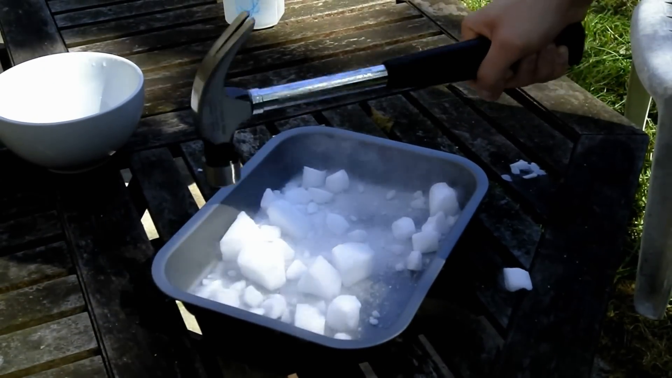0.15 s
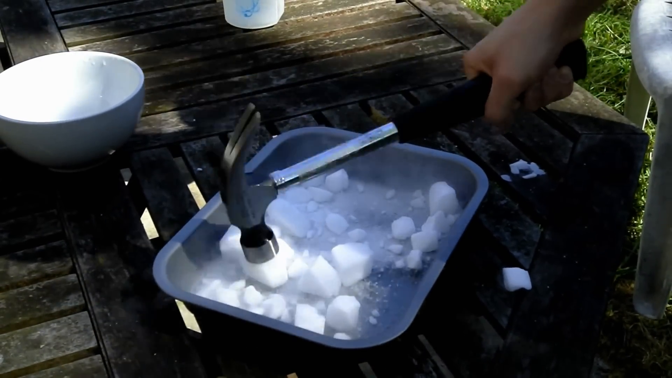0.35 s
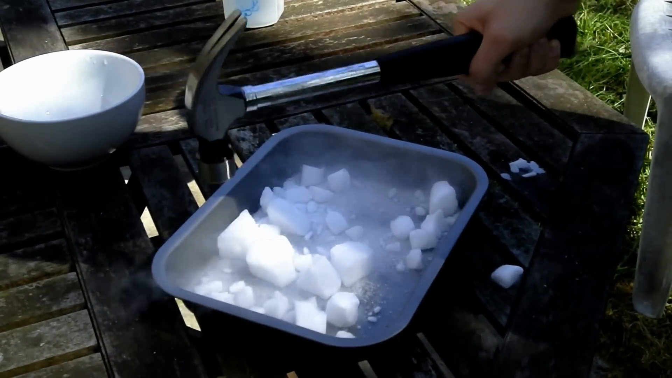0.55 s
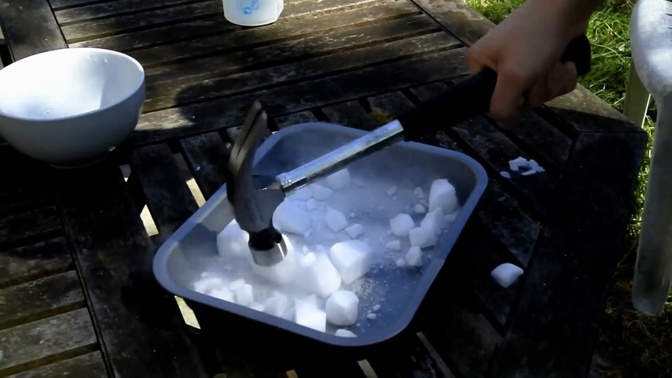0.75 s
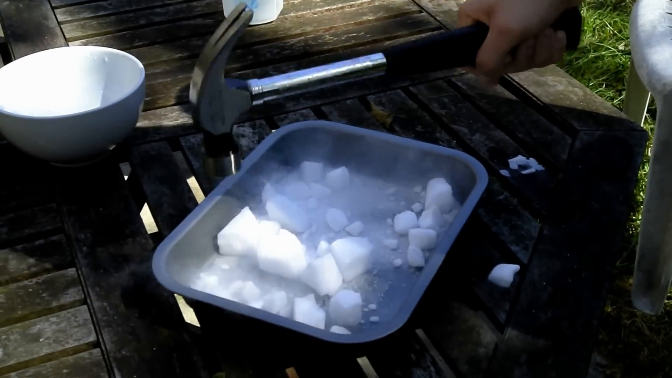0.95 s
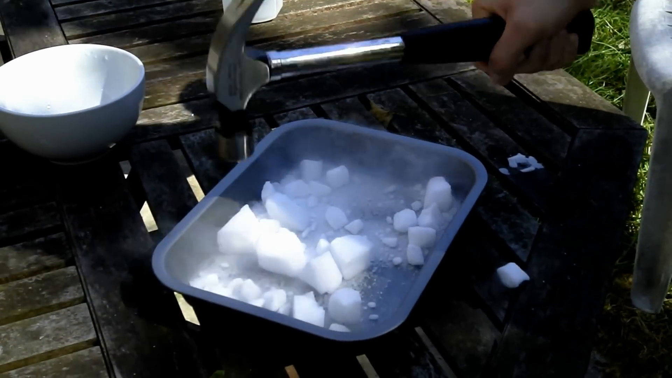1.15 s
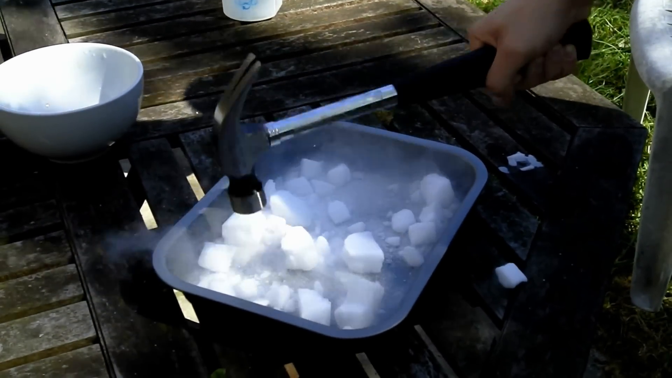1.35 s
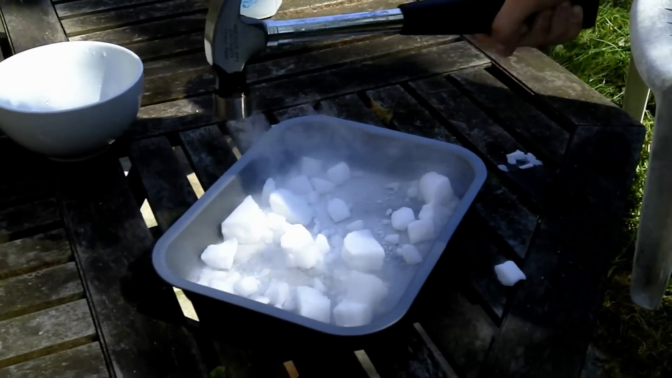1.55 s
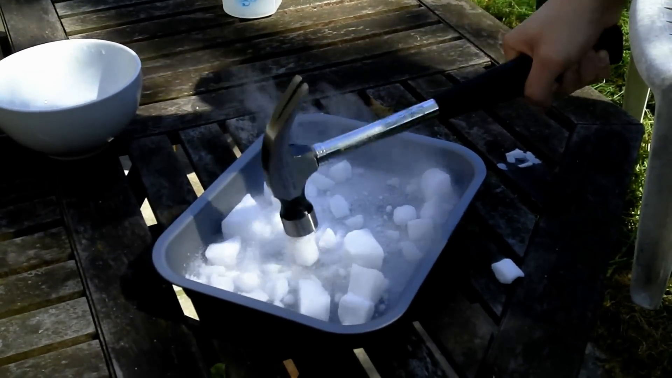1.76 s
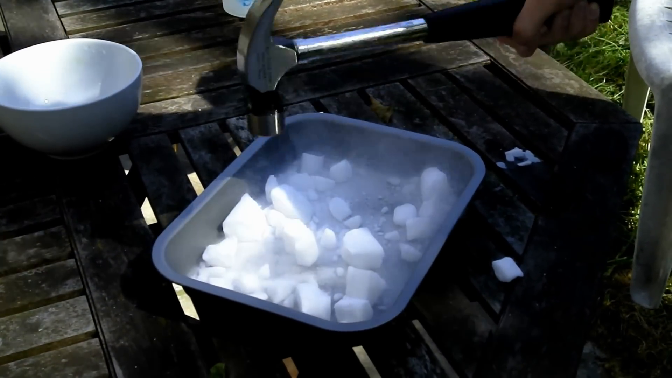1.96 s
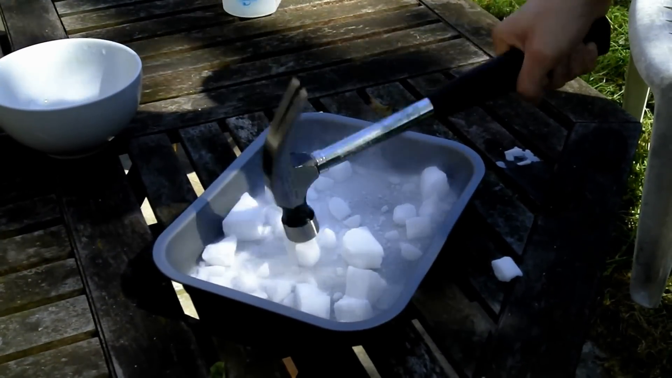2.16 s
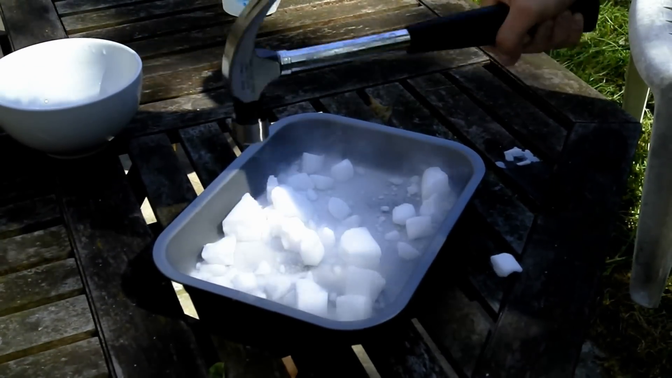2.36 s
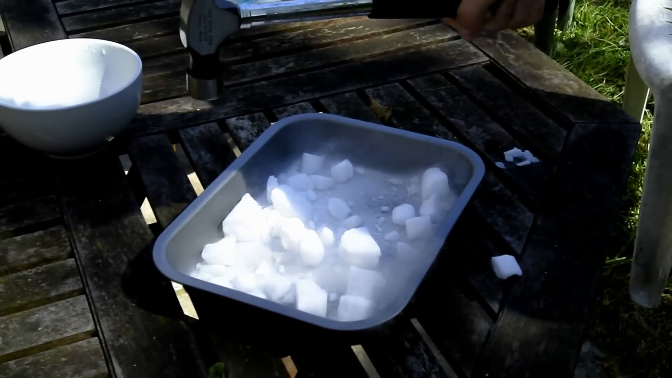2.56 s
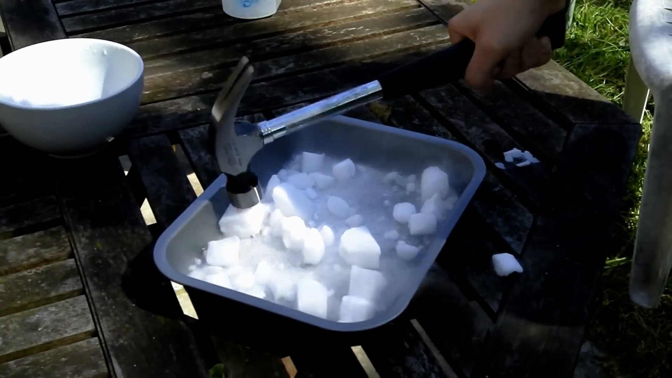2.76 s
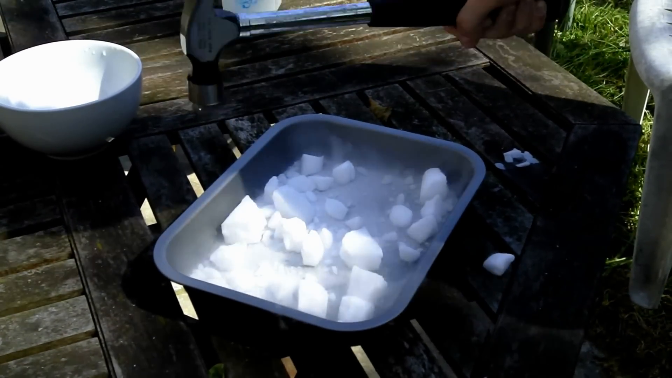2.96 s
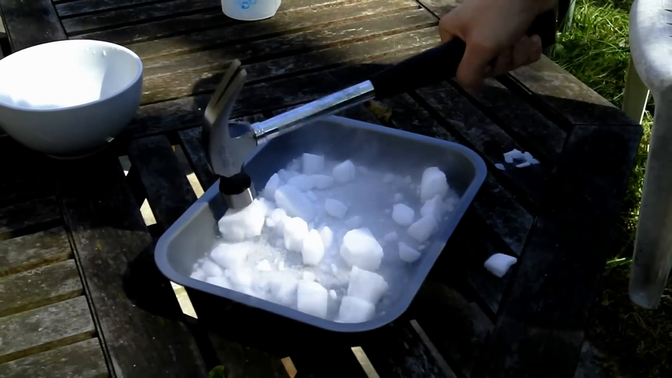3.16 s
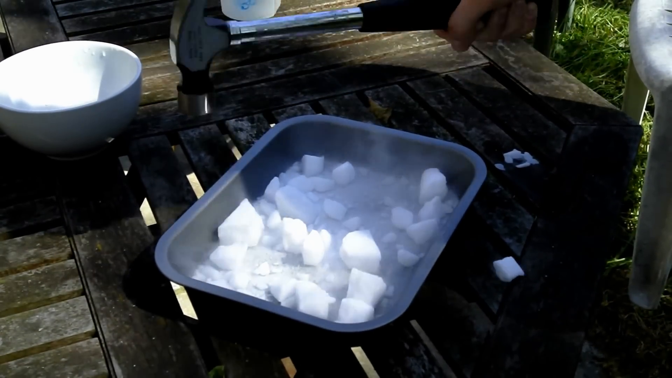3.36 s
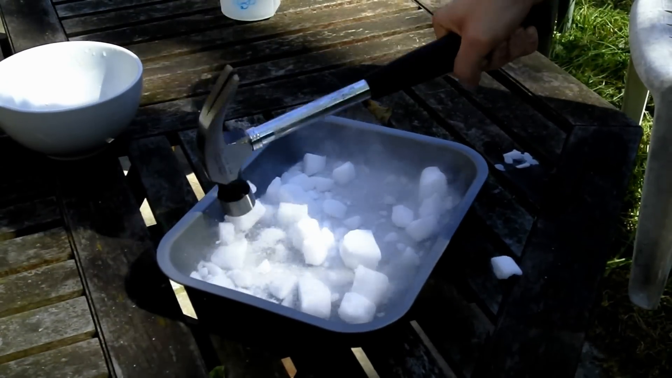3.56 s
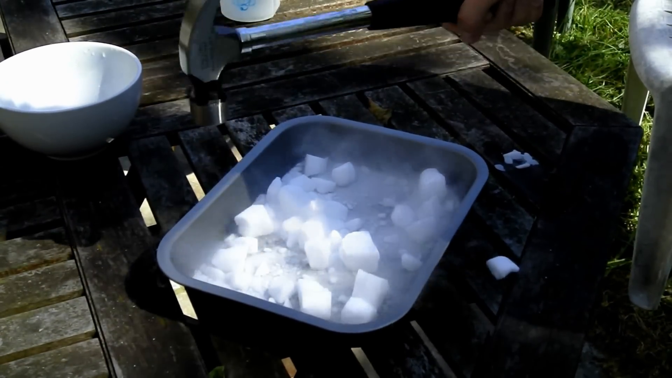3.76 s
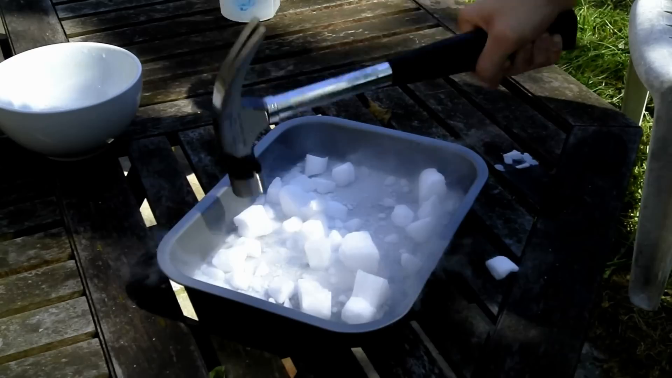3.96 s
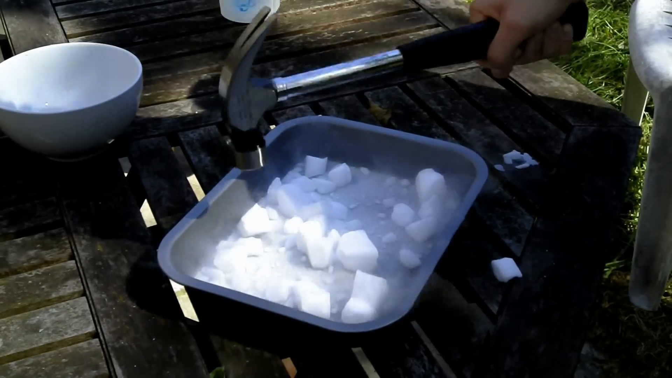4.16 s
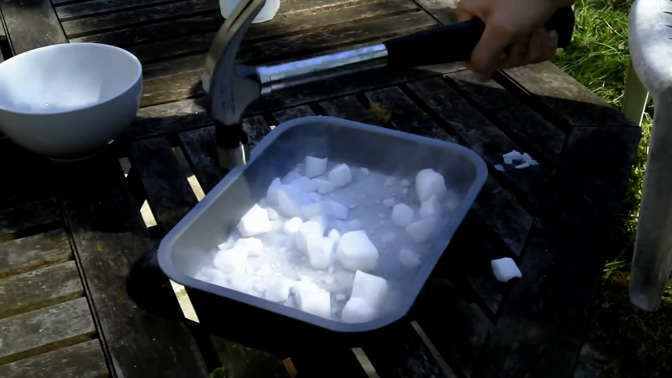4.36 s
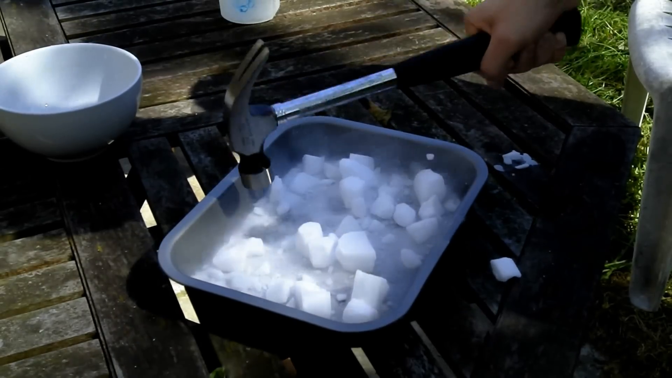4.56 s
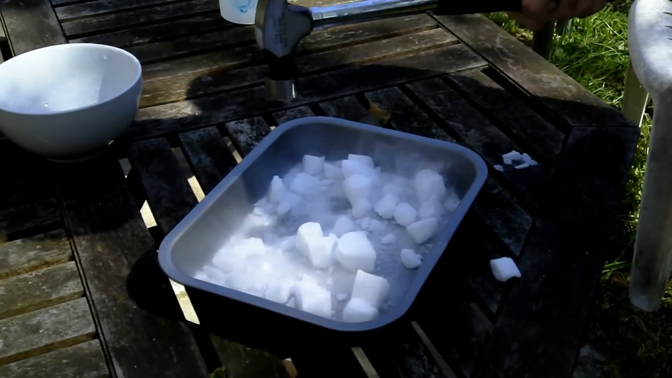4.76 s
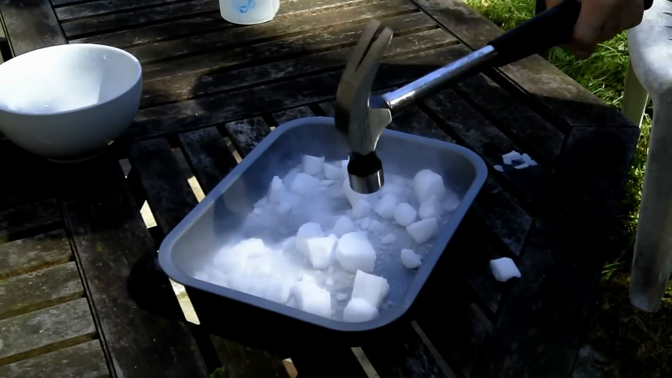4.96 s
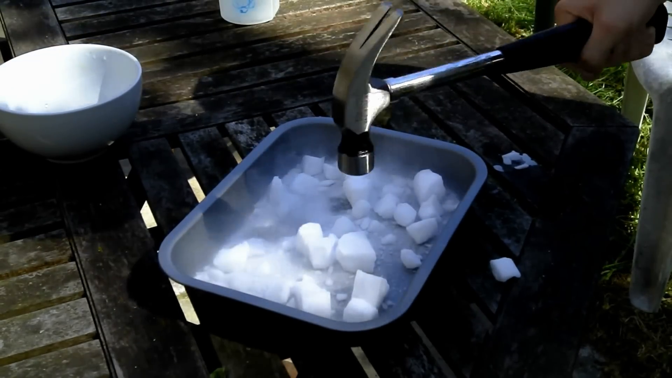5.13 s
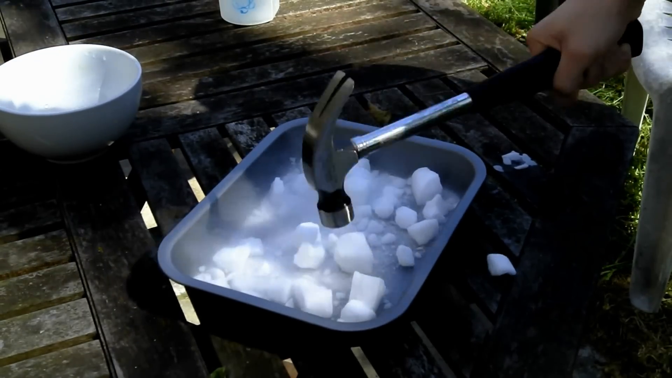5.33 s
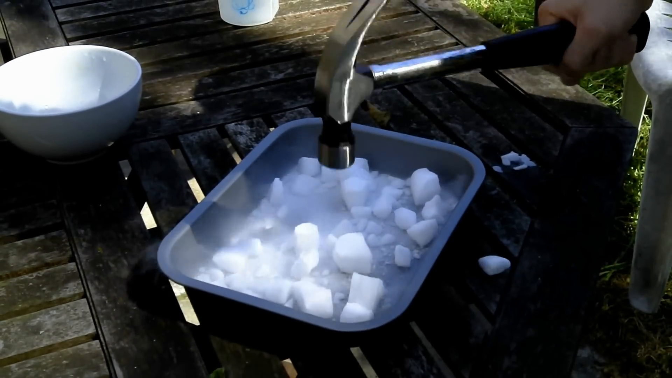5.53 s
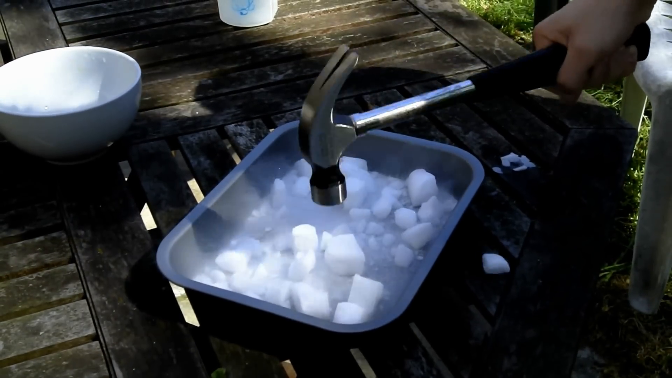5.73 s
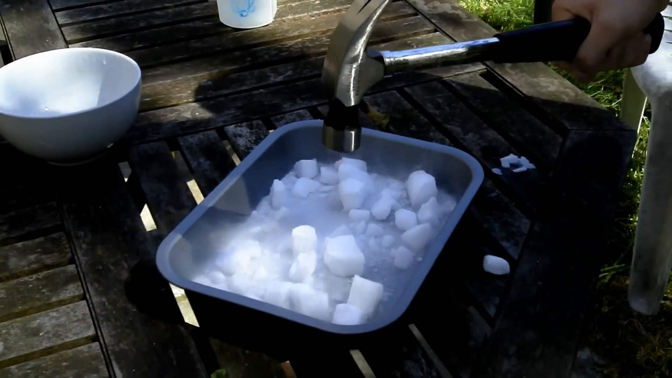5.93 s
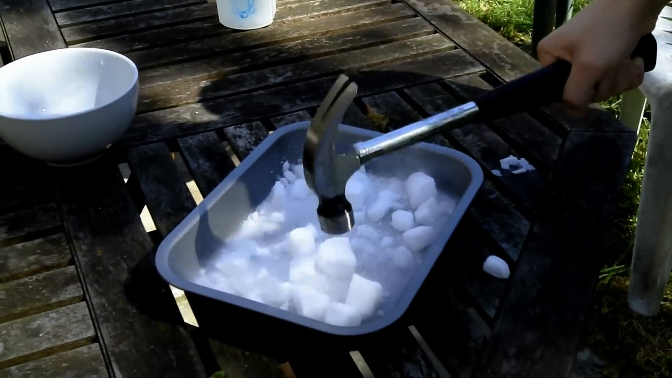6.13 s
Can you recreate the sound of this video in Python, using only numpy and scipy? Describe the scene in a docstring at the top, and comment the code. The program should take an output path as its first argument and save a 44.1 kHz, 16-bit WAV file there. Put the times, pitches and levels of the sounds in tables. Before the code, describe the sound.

A hammer smashes lumps of dry ice in a metal tray outdoors, sharp cracks, rattle and pattering splinters over low rumbling wind.

```python
"""Fourteen sharp cracks with thumps, a rattling tray and pattering splinters, over rumbling wind, hiss and a whine.
A claw hammer smashes lumps of dry ice in a metal tray on a wooden garden table. Dense bursts of tiny clicks
make the cracks, rattle and splinters, and damped resonances make the tray ring. Filtered noise makes
the wind and the soft outdoor hiss; a slightly wavering sine makes the thin whine, which comes in spells."""
import sys
import numpy as np
from scipy import signal
from scipy.fft import rfft, irfft
from scipy.io import wavfile
from scipy.ndimage import uniform_filter1d

SR = 44100
rng = np.random.default_rng(int(sys.argv[2]) if len(sys.argv) > 2 else 0)


def digitize_waveform(pressure):
    """Quantize a signal to 16-bit integers and store it at the path in sys.argv[1].

    Rows of a 2-D input are taken as channels; values are limited to [-1, 1].
    """
    field = np.atleast_2d(pressure).T
    bounded = np.clip(field, -1, 1)
    quanta = np.round(bounded * 32767).astype(np.int16)
    wavfile.write(sys.argv[1], SR, quanta)


N = 277372
TIME = np.arange(N) / SR   # seconds

# All dB values in the tables are relative: each layer also has an overall level.
# Outdoor hiss over time. Each row: time in seconds, level in dB.
HISS_LEVEL = [(0.025, -61), (0.78, -68.4), (1.73, -72), (2.62, -74.5), (3.15, -59), (3.55, -51),
              (4.04, -53), (5.25, -53.5), (5.66, -61.5), (6.08, -62)]
# Spells of the whine. Each row: start in seconds, end in seconds, level in dB relative to the hiss curve.
WHINE_SPELLS = [(0.0, 0.507, 6.5), (1.093, 1.355, 0), (2.498, 3.12, 7), (3.45, 5.08, 3.5)]
# Strength of the breeze. Each row: time in seconds, rumble level in dB.
BREEZE = [(0, -20.5), (0.35, -17.5), (0.95, -14.5), (1.12, -18.5), (1.4, -14), (1.7, -18.5), (1.9, -14),
          (2.35, -18.5), (2.72, -13.5), (2.95, -22.5), (3.45, -22), (3.95, -19.5), (4.35, -20.5),
          (4.95, -22), (5.15, -18.5), (5.7, -19.5), (6.08, -38), (6.29, -31.5)]
# Gusts that buffet the microphone. Each row: time in seconds, buffet level in dB, swell of the wind in dB.
GUSTS = [(0.273, -56, -10), (0.577, -25, -11.5), (0.619, -26, -13), (0.649, -17.5, -24), (0.85, -29.5, -16),
         (1.258, -28.5, -14), (1.432, -22, -17), (1.527, -29.5, -11.5), (1.905, -34, -17.5),
         (1.991, -31.5, -25), (2.156, -29, -14), (2.484, -30, -7.5), (2.512, -35.5, -15), (2.63, -34, -13),
         (2.674, -21.5, -15), (2.702, -22, -17), (3.91, -45, -19), (4.32, -52.5, -20.5),
         (5.568, -43.5, -23)]
# Secondary knocks and single chips in the tray. Each row: start in seconds, level in dB.
KNOCKS_AND_CHIPS = [(1.599, -34.5), (1.621, -44.5), (2.293, -9), (2.355, -16), (2.382, -23.5),
                    (3.3664, -12), (3.4335, -21), (3.895, -23.5), (3.946, -25.5), (4.125, -6),
                    (4.664, -11.5), (4.696, -17.5), (4.7306, -21), (4.755, -23), (4.781, -24.5),
                    (5.587, -25.5), (5.8465, -24), (6.223, -16)]
# Hammer blows. Each row: time in seconds, crack level in dB, thud level in dB, knock pitch in Hz,
# knock level in dB, rattle level in dB, time for the rattle to fall 60 dB in seconds,
# splinter shower level in dB, extra length of the shower in seconds.
HAMMER_BLOWS = [(0.0624, -9, -28.5, 1550, -10, -26, 0.42, -30.5, 0.013),
                (0.4731, -10, -35, 1260, -15.5, -24.5, 0.31, -42, 0.027),
                (0.8773, -12, -29, 1180, -32, -31.5, 0.39, -48.5, 0.06),
                (1.3453, -13.5, -36, 1250, -25, -24, 0.27, -37.5, 0.021),
                (1.8177, -16.5, -56.5, 459, -8.5, -27.5, 0.29, -41.5, 0.0097),
                (2.2787, -18.5, -35, 668, -21, -29, 0.43, -44, 0.024),
                (2.831, -11.5, -24, 880, -21, -26.5, 0.42, -38, 0.0084),
                (3.2399, -7.5, -20, 905, -15, -23.5, 0.62, -30, 0.011),
                (3.624, -5.5, -19, 1290, -23, -21.5, 0.52, -23.5, 0.042),
                (4.111, -9, -16, 864, -7, -24.5, 0.48, -26.5, 0.0038),
                (4.5285, -6.5, -20, 1260, -12, -22, 0.3, -33.5, 0.098),
                (5.354, -4.5, -18, 920, -11, -25, 0.46, -35, 0.025),
                (5.7209, -6.5, -21.5, 682, -4, -26.5, 0.45, -35, 0.004),
                (6.153, -6.5, -21, 637, -7, -28, 1, -27.5, 0.089)]
# Resonances of the loaded tray on its table. Each row: pitch in Hz, width in Hz, level in dB.
TRAY_MODES = [(158, 80, 11), (400, 57, 7), (475.2, 29, 13.5), (635, 44, 6), (720, 72, 7), (927, 90, 3),
              (1231, 60, 5), (1540, 230, -4.5), (2210, 1500, -6), (3520, 69, -3.5)]
# Tone colour of each layer. Each row: frequency in Hz, level in dB.
HISS_COLOUR = [(40, -12), (130, 4), (300, 2.5), (500, 0), (950, -4), (1100, -5.5), (1700, -10.5),
               (3100, -19), (6400, -19.5), (8500, -23), (11000, -25.5), (15000, -35)]
RUMBLE_COLOUR = [(8, -11), (18, 3), (30, -0.5), (50, -9), (85, -29), (150, -44), (300, -59), (1000, -92)]
TURBULENCE_COLOUR = [(20, -5.5), (55, 6), (95, 6), (160, -13), (300, -33), (700, -49), (2000, -80)]
BUFFET_COLOUR = [(15, -7.5), (60, 6.5), (130, -4), (250, -17.5), (600, -41), (1500, -55), (5000, -92.5)]
SPLINTER_COLOUR = [(100, -18), (300, 0.5), (700, 0.5), (2000, -4), (6000, -2), (9000, -8), (12000, -7.5),
                   (15000, -15)]
RATTLE_COLOUR = [(60, -17), (150, -12.5), (300, -6.5), (700, -3), (1500, 0.5), (3000, -7), (6000, -9.5),
                 (9000, -17.5), (15000, -22)]
CRACK_COLOUR = [(100, -21.5), (300, -1), (700, -4), (1500, -2.5), (3000, -3), (6000, -1), (9000, -6),
                (15000, -11.5)]
CLATTER_COLOUR = [(150, -12.5), (400, -19), (700, -7), (1500, -4.5), (3000, -1.5), (6000, -6.5),
                  (9000, -10.5), (15000, -22.5)]
THUD_COLOUR = [(40, -14), (100, -2.5), (180, 1), (290, -2), (450, -7.5), (700, -9.5), (1100, -16.5),
               (3000, -51.5)]
# Stereo width at each pitch. Each row: frequency in Hz, level of the sides against the middle in dB.
STEREO_WIDTH = [(60, -7.5), (200, -21), (400, -16.5), (900, -18), (1400, -12), (2500, -8), (5000, -6),
                (9000, -4.5), (15000, -4.5)]

WHINE_HZ, WHINE_FADE_S = 1278, 0.055
GUST_S = 0.022   # spread (standard deviation) of a gust's swell
# the rumble swells as the hammer comes down: rise, lead on the blow, spread (standard deviation)
SWING_DB, SWING_LEAD_S, SWING_S = 5, 0.02, 0.025
# splinters: flight before the first land, time for the shower to thicken, time to fall 60 dB as it thins out
FLIGHT_S, THICKEN_S, THIN_OUT_T60_S = 0.05, 0.029, 0.14
CRACK_T60_S = 0.011   # time for the crack to fall 60 dB
NOTCH_HZ, CUTOFF_HZ = 7900, 15900


def from_db(db):
    """Turn decibels into an amplitude factor."""
    return 10 ** (np.asarray(db) / 20)


def rms_one(x):
    """Scale a signal to an rms (average strength) of 1."""
    return x / np.sqrt(np.mean(x ** 2) + 1e-20)


def in_time(rows):
    """Join (seconds, value) rows with straight lines."""
    return np.interp(TIME, *np.transpose(rows))


def gains(points, size):
    """A colour's gain at every frequency step of an FFT."""
    hz, level_db = np.transpose(points)
    bin_hz = np.fft.rfftfreq(size, 1 / SR)
    return from_db(np.interp(np.log(bin_hz + 1), np.log(hz), level_db))


def colour(x, points, size=16384, keep_power=True):
    """Filter without pre-echo (minimum phase); white noise keeps its power unless told otherwise."""
    cepstrum = irfft(np.log(gains(points, size)))
    # fold the second half onto the first, so that the response starts at once
    cepstrum[1:size // 2] *= 2
    cepstrum[size // 2 + 1:] = 0
    response = irfft(np.exp(rfft(cepstrum)))
    if keep_power:
        response = response / np.linalg.norm(response)
    return signal.oaconvolve(x, response)[:N]


def grains(per_s, spread_db):
    """Random tiny contacts of uneven size; rms 1."""
    sizes = from_db(spread_db * np.minimum(rng.exponential(1, N), 4))
    signs = rng.choice([-1, 1], N)
    happens = rng.random(N) < per_s / SR
    return rms_one(sizes * signs * happens)


def clumps(depth_db):
    """A quick random change of strength that bunches grains over a few milliseconds; rms 1."""
    wander = colour(rng.standard_normal(N), [(60, 0), (150, -12), (600, -50)])
    return rms_one(from_db(depth_db * wander))


def burst(start, rise, hold, t60):
    """Envelope that rises, then dies away once its age passes hold; it lasts at most a second."""
    out = np.zeros(N)
    first = int(start * SR)
    age = TIME[:min(SR, N - first)]
    decay = from_db(-60 * np.maximum(age - hold, 0) / t60)
    out[first:first + len(age)] = np.minimum(age / rise, 1) * decay
    return out


def pulses(events):
    """One single-sample impulse for each (seconds, dB)."""
    out = np.zeros(N)
    for s, level_db in events:
        out[int(s * SR)] = from_db(level_db)
    return out


def swell(middle, spread):
    """A smooth bell-shaped bump of height 1."""
    return np.exp(-((TIME - middle) / spread) ** 2 / 2)


def stereo(force, spectrum, wide_db):
    """Every contact comes from its own spot; the treble is wider than the bass."""
    mid = colour(force, spectrum)
    scattered = colour(force * rng.choice([-1, 1], N), spectrum)
    side = from_db(wide_db) * colour(scattered, STEREO_WIDTH, keep_power=False)
    return np.array([mid + side, mid - side])


def resonance(x, hz, width_hz):
    """One damped mode that rings when struck; gain 1 at its peak."""
    r = np.exp(-np.pi * width_hz / SR)
    feedback = [1, -2 * r * np.cos(2 * np.pi * hz / SR), r * r]
    return (1 - r * r) / 2 * signal.lfilter([1, 0, -1], feedback, x + 1e-18)


def tray(x, ring_db):
    """The direct sound plus the tray's modes, damped by the ice lying in it."""
    ringing = sum(from_db(level_db + ring_db) * resonance(x, hz, width_hz)
                  for hz, width_hz, level_db in TRAY_MODES)
    return x + ringing


def outdoor_hiss():
    """Soft, wide outdoor noise whose level drifts."""
    return from_db(in_time(HISS_LEVEL) + 11) * stereo(rng.standard_normal(N), HISS_COLOUR, wide_db=7)


def whine():
    """A thin tone, stronger on the left, that comes in spells and follows the hiss's level."""
    spells = 0
    for start, end, level_db in WHINE_SPELLS:
        fade = np.clip(np.minimum(TIME - start, end - TIME) / WHINE_FADE_S, 0, 1)
        spells = spells + from_db(level_db) * fade
    waver = colour(rng.standard_normal(N), [(5, 0), (30, -12), (200, -60)])
    pitch_hz = WHINE_HZ + 2.0 * waver
    tone = np.sin(2 * np.pi * np.cumsum(pitch_hz) / SR)
    return from_db(in_time(HISS_LEVEL) + 1.5) * spells * tone * from_db([[2.1], [-2.5]])


def wind_strength(uneven_db):
    """In dB: an uneven breeze that swells with every downstroke, with the gusts on top."""
    strokes_db = SWING_DB * sum(swell(s - SWING_LEAD_S, SWING_S) for s, *_ in HAMMER_BLOWS)
    wander = colour(rng.standard_normal(N), [(6, 0), (15, -12), (100, -60), (1000, -130)])
    breeze = from_db(in_time(BREEZE) + strokes_db + uneven_db * wander)
    gusts = sum(from_db(level_db) * swell(s, GUST_S) for s, _, level_db in GUSTS)
    return 20 * np.log10(breeze + gusts)


def eddies(spectrum, shared):
    """Air pressure at two ports, partly the same at both, evened out so that the gust sets its strength."""
    common, left, right = (colour(rng.standard_normal(N), spectrum) for _ in range(3))
    pressure = np.sqrt(shared) * common + np.sqrt(1 - shared) * np.array([left, right])
    power = uniform_filter1d(np.mean(pressure ** 2, axis=0), size=3000)
    return pressure / np.sqrt(power + 0.087)   # the small constant limits the boost of quiet moments


def buffets():
    """A gust shoves the microphone: a pressure pulse with a short flutter of noise around it."""
    flutter = sum(from_db(level_db) * burst(s - 0.012, rise=0.019, hold=0.011, t60=0.08)
                  for s, level_db, _ in GUSTS)
    shoves = pulses((s + 0.0026, level_db) for s, level_db, _ in GUSTS)
    push = from_db(34.5) * shoves + from_db(8.0) * flutter * rng.standard_normal(N)
    return colour(push, BUFFET_COLOUR)


def wind(strong_db, steepness, full_gust_db):
    """A deep rumble; small eddies grow faster than it does, up to a full gust, and buffets come on top."""
    gust_db = wind_strength(uneven_db=2.0)
    rumble = from_db(gust_db - 0.54) * eddies(RUMBLE_COLOUR, shared=0.015)
    small_db = strong_db + steepness * np.minimum(gust_db - full_gust_db, 0)
    turbulence = from_db(small_db) * eddies(TURBULENCE_COLOUR, shared=0.11)
    return (rumble + turbulence + buffets()) * from_db([[1.5], [-2.2]])   # stronger on the left


def tinkle(falling, per_s, width_hz, count):
    """The larger splinters ring briefly as they land, each at the pitch of its size and from its own side."""
    out = 0
    for hz, pan_db in zip(np.geomspace(1500, 11000, count), rng.normal(0, 4.5, count)):
        rings = resonance(falling * grains(per_s=per_s, spread_db=1.5), hz, width_hz)
        out = out + rings * from_db([[pan_db], [-pan_db]])
    return out


def splinters():
    """Splinters thrown up by a blow patter back into the tray; a few knocks and chips sound on their own."""
    falling = sum(from_db(level_db) * burst(s + FLIGHT_S, THICKEN_S, THICKEN_S + length, THIN_OUT_T60_S)
                  for s, *_, level_db, length in HAMMER_BLOWS)
    single_hits = sum(from_db(level_db) * burst(s, rise=0.00078, hold=0.0025, t60=0.045)
                      for s, level_db in KNOCKS_AND_CHIPS)
    contacts = grains(per_s=2200, spread_db=3.0) * clumps(depth_db=0.2)
    patter = from_db(-0.5) * falling * contacts
    knocks_and_chips = from_db(-15.5) * single_hits * rng.standard_normal(N)
    landings = tray(stereo(patter + knocks_and_chips, SPLINTER_COLOUR, wide_db=1.0), ring_db=-0.5)
    return landings + from_db(1) * tinkle(falling, per_s=11, width_hz=90, count=28)


def rattle(settle_s):
    """The jolted tray and its loose lumps chatter in many small contacts and settle."""
    shaking = sum(from_db(level_db) * burst(s, settle_s, settle_s, t60)
                  for s, *_, level_db, t60, _, _ in HAMMER_BLOWS)
    contacts = grains(per_s=1800, spread_db=-3.0)
    return tray(stereo(shaking * contacts, RATTLE_COLOUR, wide_db=3.0), ring_db=-2.0)


def hammer(bite_s, crush_s, clatter_t60, knock_t60):
    """The head bites, the lump cracks and knocks on the tray, its pieces clatter, the table takes the thump."""
    crack = clatter = knock = 0
    for s, crack_db, _, knock_hz, knock_db, *_ in HAMMER_BLOWS:
        crack = crack + from_db(crack_db) * burst(s - bite_s, bite_s, crush_s, CRACK_T60_S)
        # the clatter grows less than the crack
        clatter = clatter + from_db(0.69 * crack_db) * burst(s, bite_s, crush_s, clatter_t60)
        # the knock's pitch is set by where the lump lies
        tone = np.sin(2 * np.pi * knock_hz * (TIME - s))
        knock = knock + from_db(knock_db) * burst(s, bite_s, crush_s, knock_t60) * tone
    fractures = from_db(1.0) * crack * grains(per_s=16000, spread_db=-1.0)
    pieces = from_db(-9) * clatter * grains(per_s=4000, spread_db=1.0)
    cracks = stereo(fractures, CRACK_COLOUR, wide_db=-2.0)
    clatters = stereo(pieces, CLATTER_COLOUR, wide_db=-8)
    thumps = pulses((s + crush_s, thud_db) for s, _, thud_db, *_ in HAMMER_BLOWS)
    thuds = from_db(21) * colour(thumps, THUD_COLOUR)
    return tray(cracks + clatters + thuds, ring_db=-5) + from_db(-1.5) * knock


def scene():
    """Add up all the layers, from the background to the hammer."""
    background = outdoor_hiss() + whine()
    breeze = wind(strong_db=-17.5, steepness=3.08, full_gust_db=-10.5)
    debris = splinters() + rattle(settle_s=0.0034)
    blows = hammer(bite_s=0.00086, crush_s=0.00331, clatter_t60=0.097, knock_t60=0.02)
    return background + breeze + debris + blows


def record(dry):
    """The recorder has a narrow notch in the treble, clips peaks beyond full scale and cuts the top."""
    notched = signal.lfilter(*signal.iirnotch(NOTCH_HZ, 9, fs=SR), dry)
    clipped = np.clip(notched, -1, 1)
    top_cut = signal.ellip(10, 0.1, 70, CUTOFF_HZ, fs=SR, output="sos")
    return signal.sosfilt(top_cut, clipped)


dry = scene()
out = record(dry)
digitize_waveform(out)
```